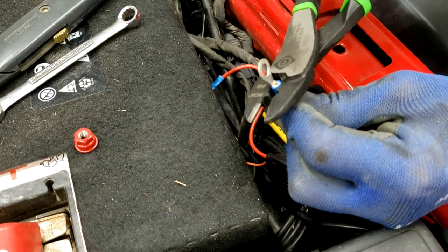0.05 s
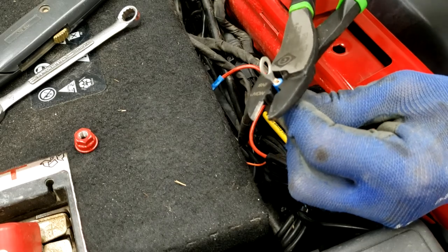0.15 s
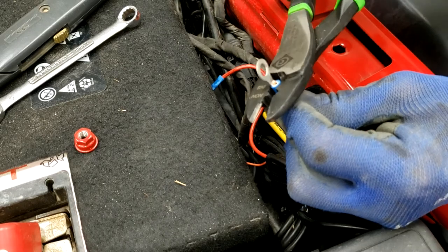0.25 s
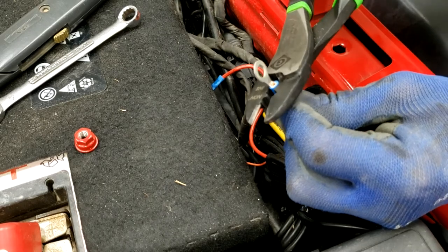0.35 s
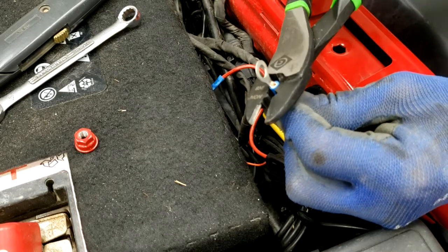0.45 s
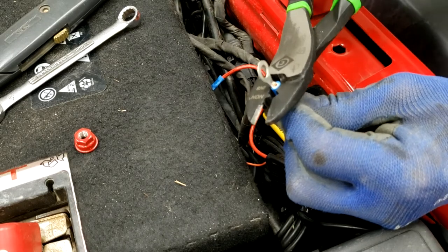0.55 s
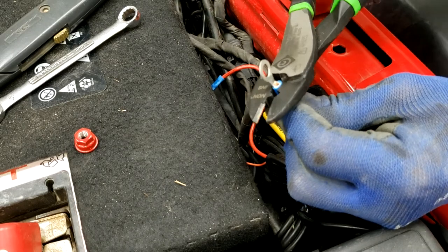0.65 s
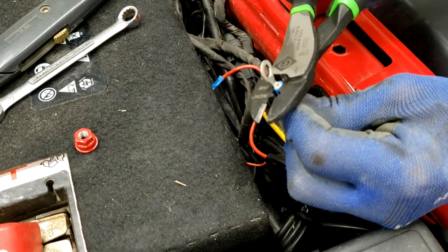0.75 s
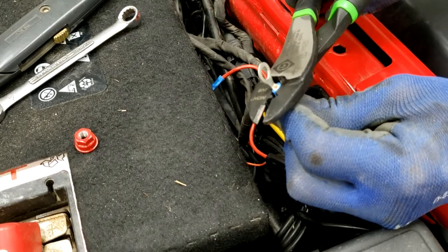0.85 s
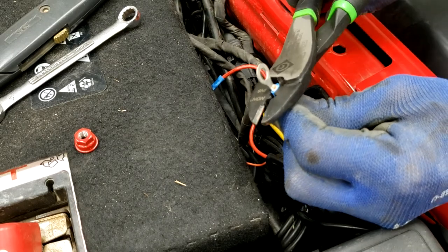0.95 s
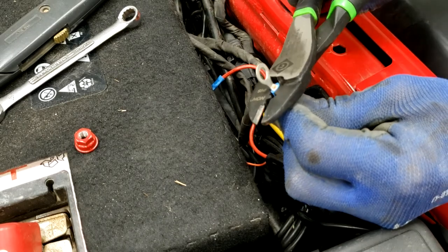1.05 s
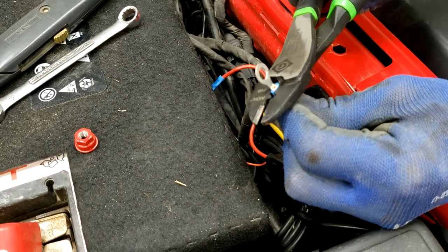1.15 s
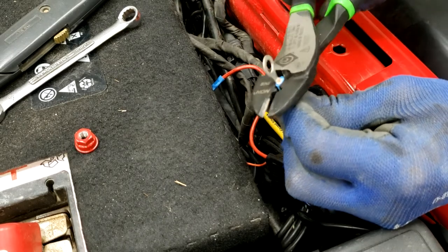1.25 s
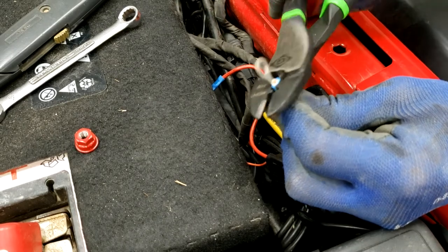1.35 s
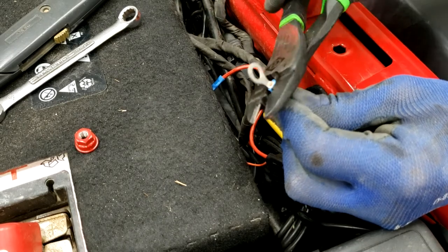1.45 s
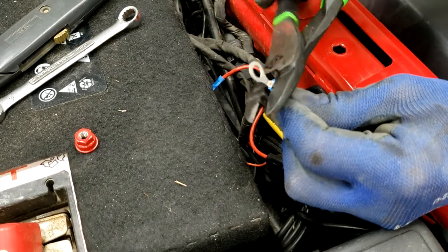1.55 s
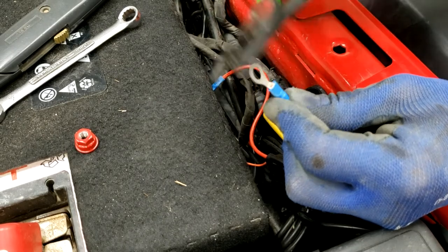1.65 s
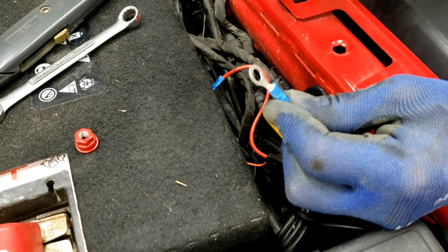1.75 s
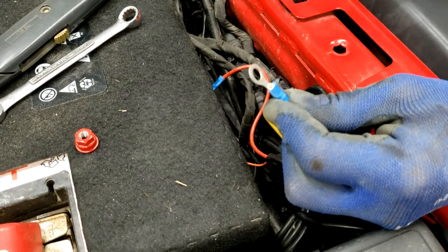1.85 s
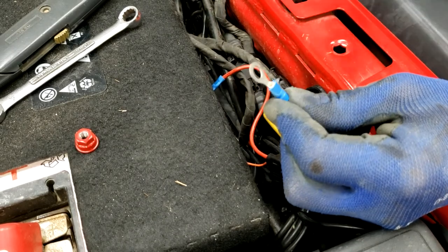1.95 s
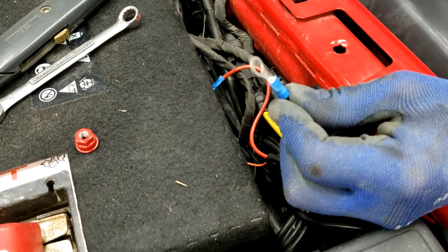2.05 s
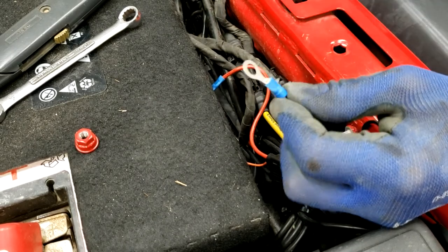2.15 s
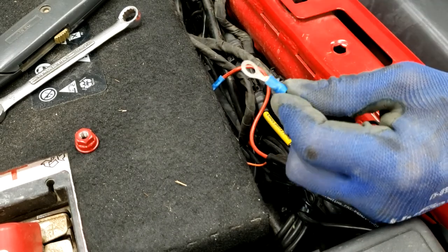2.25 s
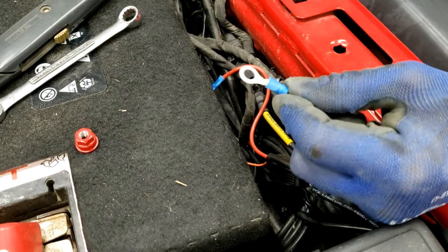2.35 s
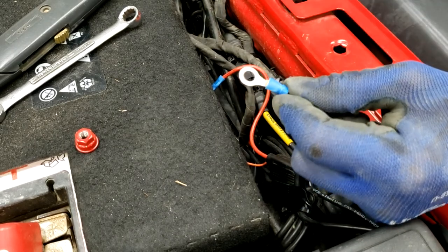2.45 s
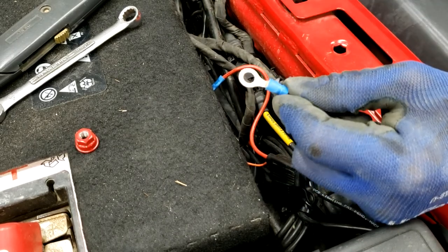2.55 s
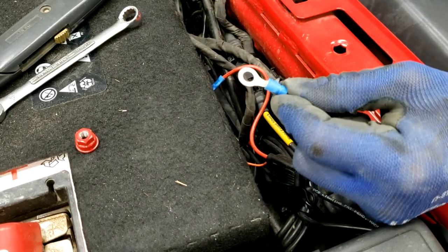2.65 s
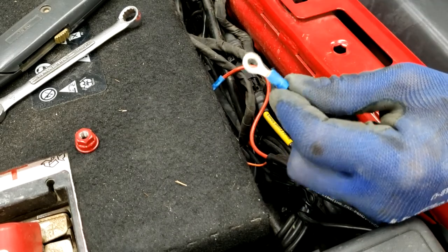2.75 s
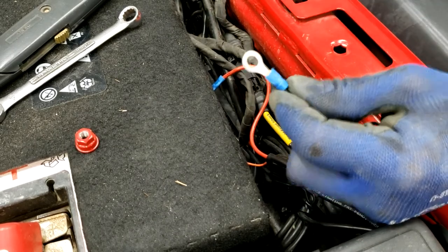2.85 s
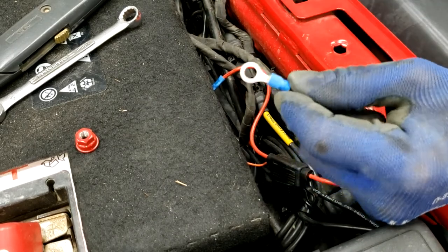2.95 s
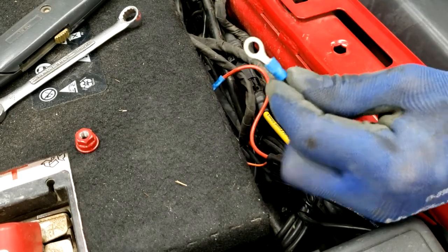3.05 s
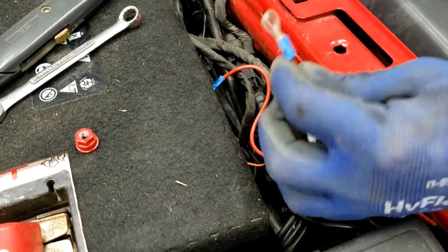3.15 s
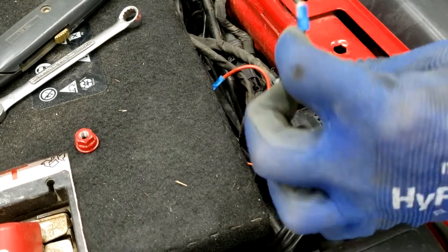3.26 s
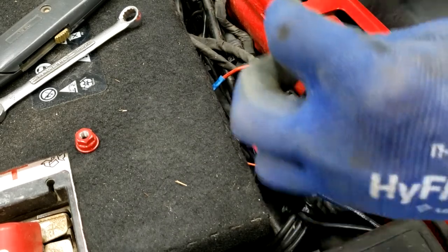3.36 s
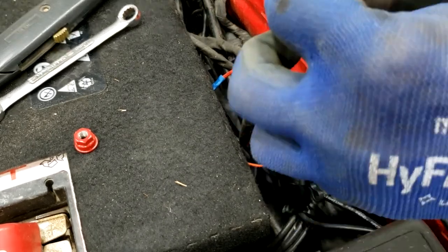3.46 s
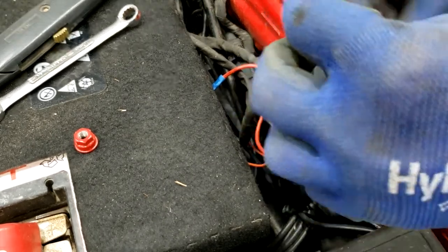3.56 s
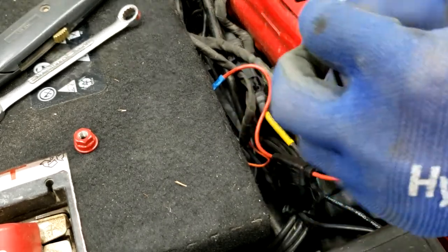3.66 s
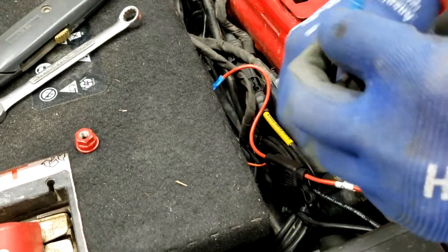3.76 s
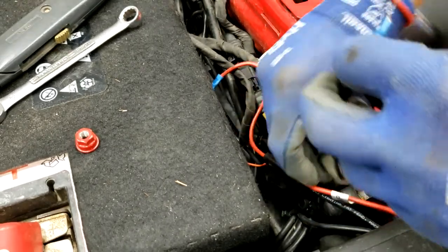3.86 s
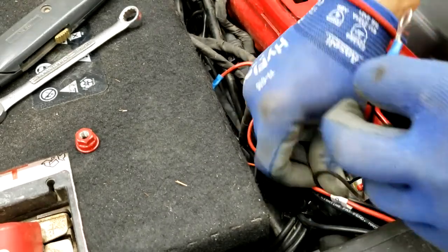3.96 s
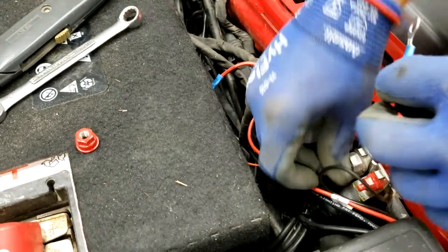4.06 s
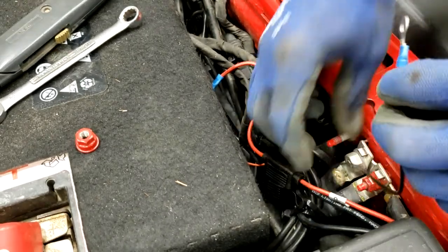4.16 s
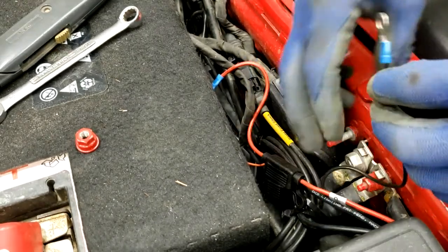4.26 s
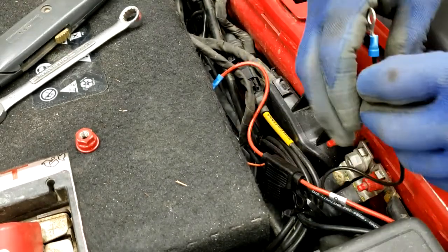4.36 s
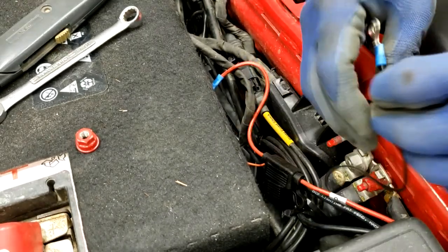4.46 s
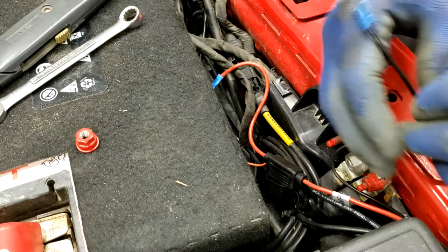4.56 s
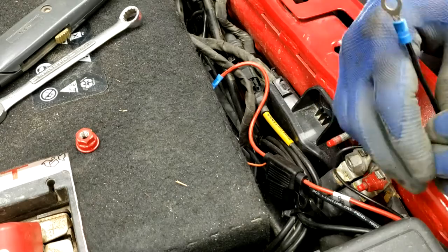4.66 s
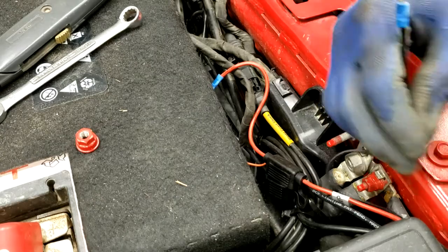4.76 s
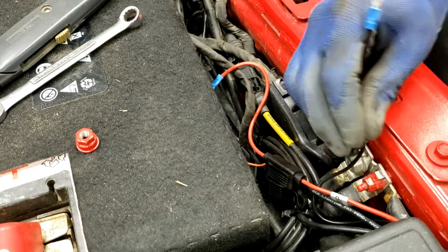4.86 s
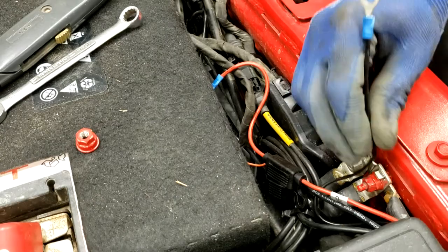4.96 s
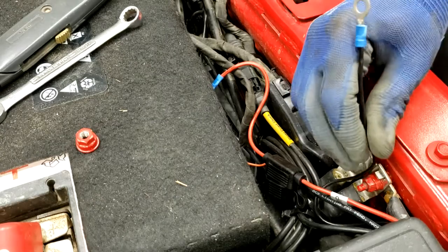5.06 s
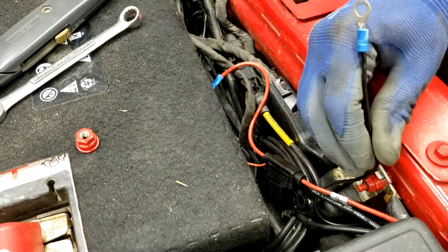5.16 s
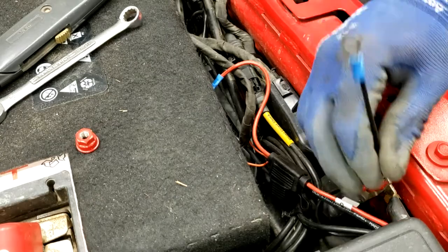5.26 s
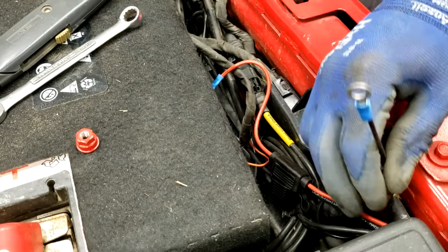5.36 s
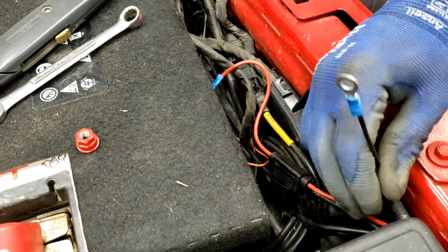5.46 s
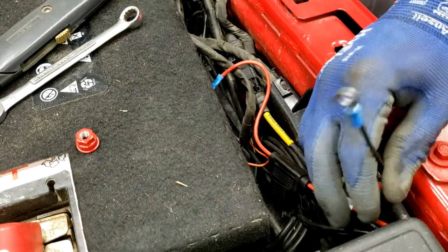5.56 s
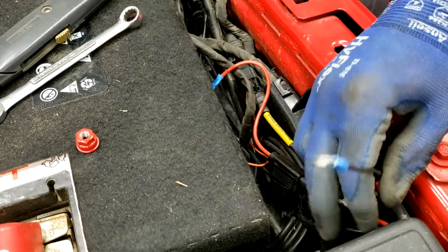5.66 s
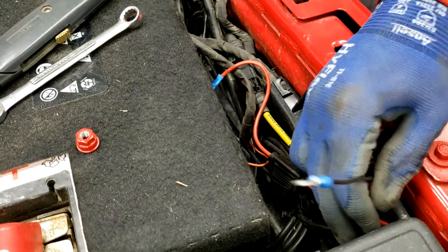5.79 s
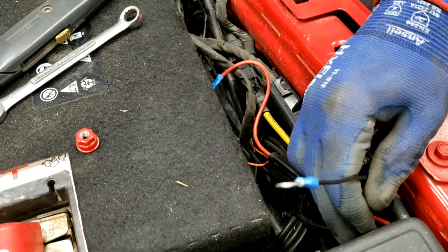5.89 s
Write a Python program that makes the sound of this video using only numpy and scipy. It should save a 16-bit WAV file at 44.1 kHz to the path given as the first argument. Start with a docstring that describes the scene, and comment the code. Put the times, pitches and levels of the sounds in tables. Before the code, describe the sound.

A sharp release crack, a steel clink and a bouncing tool clatter over garage ventilation, followed by small wire ticks, glove rubs and a hissing cable.

```python
"""Ventilation hums in a garage throughout: coloured noise and one noise-driven standing wave.
Over its first ticks and rubs, hand crimpers let go of a wire terminal: noise bursts and a swelling panel.
Their jaws click shut on ringing steel modes; the tool clacks down on a hollow plastic cover, bounces and
rocks to rest, as force pulses driving damped modes. Then gloved hands sort the wires with small ticks,
rubs and bumps, all short noise bursts or struck modes, and a cable slides hissing along the bodywork."""
import sys
import numpy as np
from scipy import signal
from scipy.fft import rfft, irfft, next_fast_len
from scipy.io import wavfile
from scipy.ndimage import uniform_filter1d

SR = 44100
rng = np.random.default_rng(int(sys.argv[2]) if len(sys.argv) > 2 else 0)


def dump_mix(stems):
    """Bounce the given channels to the path in sys.argv[1] as a 16-bit WAV at rate SR."""
    frames = np.atleast_2d(stems).T  # one column per channel
    limited = np.clip(frames, -1, 1)  # hard clip at full scale
    pcm = np.round(limited * 32767).astype(np.int16)
    wavfile.write(sys.argv[1], SR, pcm)


N = 261287
TIME = np.arange(N) / SR

# how busily the hands sort the wires [time_s, level_db]
HANDLING = [(3.1, -71), (3.3, -66.5), (3.55, -75), (4.0, -68.5), (4.4, -77.5), (4.55, -60), (5.019, -62)]


def from_db(db):
    """Logarithmic level: decibels to amplitude gain."""
    return 10 ** (np.asarray(db) / 20)


def rms_one(x):
    """Power normalisation: scale to unit mean square."""
    return x / np.sqrt(np.mean(x ** 2) + 1e-20)


def at_hz(points, hz):
    """Log-frequency interpolation: read a table along a pitch-like axis."""
    table_hz, values = np.array(points).T
    return np.interp(np.log(hz + 1e-9), np.log(table_hz), values)


def level(rows):
    """Amplitude envelope: gain along a dB curve, practically silent outside it."""
    return from_db(np.interp(TIME, *np.transpose(rows), left=-200, right=-200))


def pan(db):
    """Interchannel level difference: gains that set left over right by so many dB."""
    return from_db([[db / 2], [-db / 2]])


def convolve(x, response):
    """Linear superposition: filter by an impulse response, keeping the length."""
    return signal.fftconvolve(np.atleast_2d(x), np.atleast_2d(response), axes=-1)[:, :np.shape(x)[-1]]


def colour(x, spectrum, size=4096):
    """Minimum-phase filtering: impose a dB spectrum causally by folding its cepstrum."""
    gain_db = at_hz(spectrum, np.fft.rfftfreq(size, 1 / SR))
    cepstrum = irfft(np.log(from_db(gain_db)))
    cepstrum[1:size // 2] *= 2
    cepstrum[size // 2 + 1:] = 0
    return convolve(x, irfft(np.exp(rfft(cepstrum))))


def stereo_noise(size, width_db=0):
    """Spatial coherence: white noise at two close microphones, more alike where the side is weak."""
    # side signal against mid signal [pitch_hz, side_over_mid_db]
    side_width = [(60, -6), (130, -23.5), (290, -10.5), (640, -5), (1300, 2), (3000, -0.5), (15000, 0.5)]
    mid, side = rfft(rng.standard_normal((2, size)))
    width = from_db(width_db + at_hz(side_width, np.fft.rfftfreq(size, 1 / SR)))
    return irfft(np.array([mid + width * side, mid - width * side]) / np.sqrt(1 + width ** 2), size)


def steady_noise(spectrum):
    """Stationary random excitation: coloured stereo noise of unit power for the whole scene."""
    white = stereo_noise(next_fast_len(N + SR // 10))
    return rms_one(colour(white, spectrum)[:, -N:])  # the filter's onset is dropped


def band_noise(hz, spread, size):
    """Broad resonance: stereo noise of unit power around one centre frequency."""
    edges_hz = [hz / spread, min(hz * spread, .45 * SR)]
    band = signal.butter(1, edges_hz, "band", fs=SR, output="sos")
    return rms_one(signal.sosfilt(band, stereo_noise(next_fast_len(size))[:, :size]))


def grains(depth_db, size):
    """Stick-slip friction: fibres catch and slip, so the gain wanders within a few milliseconds."""
    wander = rms_one(uniform_filter1d(rng.standard_normal(size), size=110))
    return rms_one(from_db(depth_db * wander))


def fade(t, t60):
    """Exponential damping: the amplitude falls by 60 dB in t60 seconds."""
    return np.exp(-np.log(1000) * t / t60)


def add(track, s, sound):
    """Superposition: mix a sound into a track at a time in seconds."""
    start = round(s * SR)
    track[..., start:start + sound.shape[-1]] += sound[..., :N - start]


def dying_noise(t60s, size, width_db=0):
    """High modal density: crowded modes sound as noise whose octaves each die at their own rate."""
    hz, noise = np.fft.rfftfreq(size, 1 / SR), rfft(stereo_noise(size, width_db))
    centres_hz = np.geomspace(62.5, 16000, 9)
    out = 0
    for centre, pick in zip(centres_hz, np.eye(len(centres_hz))):
        share = at_hz(np.c_[centres_hz, pick], hz)  # overlapping octave bands that sum to one
        out = out + irfft(noise * share, size) * fade(TIME[:size], at_hz(t60s, centre))
    return out


def ring(modes, swell=False):
    """Modal superposition: a body's impulse response, neighbouring modes in opposite sense."""
    t, out = TIME[:SR // 2], 0
    for k, (hz, db, t60) in enumerate(modes):
        # a swelling mode fills up before it dies; its envelope peaks at one
        rise = np.e * np.log(1000) * t / t60 if swell else 1
        out = out + (-1) ** k * from_db(db) * rise * fade(t, t60) * np.sin(2 * np.pi * hz * t)
    return out


def strikes(rows, response):
    """Impulsive excitation: the same body struck at each row of time_s, level_db."""
    out = np.zeros((2, N))
    for s, db in rows:
        add(out, s, from_db(db) * response)
    return out


def cracks(rows, spectrum, t60s, snap_db, width_db=-3.0):
    """Hard contact: each time_s, level_db snaps once and shakes the upper modes in its own way."""
    out = np.zeros((2, N))
    for s, db in rows:
        burst = dying_noise(t60s, size=8192, width_db=width_db)
        burst[:, 0] -= from_db(snap_db)  # the snap is a single sample
        add(out, s, from_db(db) * burst)
    return colour(out, spectrum)


def ventilation(boom_hz=85.24, boom_t60=0.97, boom_db=-56):
    """Flow noise and room resonance: steady air noise, with noise also driving a low standing wave."""
    # spectral density of the air noise [pitch_hz, relative_db_per_hz]
    air_spectrum = [(25, -33), (45, -7), (125, -4.5), (190, -1), (300, -2.5), (430, -2.5), (560, -9.5),
                    (830, -4), (1250, -11), (1800, -16), (2600, -18.5), (4300, -33), (8800, -46.5),
                    (15000, -42)]
    # strength of the air noise [time_s, level_db]
    air_level = [(0, -44), (2.1, -45), (3.4, -47.5), (4.4, -47.5), (5.92, -44)]
    air = from_db(np.interp(TIME, *np.transpose(air_level))) * steady_noise(air_spectrum)
    standing_wave = ring([(boom_hz, 0, boom_t60)])
    boom = rms_one(convolve(rng.standard_normal(N + SR), standing_wave)[:, -N:])
    return air + from_db(boom_db) * boom


def garage(x, build_s=0.0088):
    """Diffuse reverberation: the tail builds up as reflections arrive, then decays."""
    # reverberation time of the room [pitch_hz, t60_s]
    room_t60 = [(80, 1.4), (250, 0.78), (1000, 1.0), (4000, 0.94), (10000, 0.7), (16000, 0.01)]
    # strength of the reverberation [pitch_hz, level_db]
    room_level = [(40, -11), (90, -5), (180, -11), (280, -10.5), (500, -5.5), (1500, -9), (5000, -11.5),
                  (14000, -5.5)]
    tail = dying_noise(room_t60, size=65536)
    tail = tail * (1 - np.exp(-(TIME[:tail.shape[1]] / build_s) ** 2))
    energy = SR * at_hz(room_t60, 1000) / (2 * np.log(1000))  # of a plain decay at 1 kHz
    return convolve(x, colour(tail / np.sqrt(energy), room_level))


def cable(grain_db=1.0, hiss_grain_db=1.5, hiss_pan_db=-6.5):
    """Sliding friction: the sheath hisses and shakes the bodywork; the hiss grows faster with speed."""
    # speed of the slide, given as a level of hiss [time_s, level_db]
    slide_speed = [(5.035, -52.5), (5.171, -49), (5.275, -56.5), (5.477, -58), (5.505, -49.5), (5.579, -68),
                   (5.765, -68), (5.847, -61), (5.92, -69.5)]
    # response of the bodywork [pitch_hz, relative_db]
    bodywork = [(50, 1), (90, 11.5), (300, 6), (400, 2), (520, 10.5), (800, 0), (1200, 2.5), (1500, -3),
                (1780, 2.5), (2200, -6), (2750, 4.5), (2950, -3), (3400, 4), (4250, -2), (4800, -6),
                (12000, -18)]
    # hiss of the sheath [pitch_hz, relative_db]
    sheath = [(2000, -9), (3400, 2), (5200, -9), (8600, -7), (9500, 3), (10000, 0), (12300, 5.5),
              (14000, -4), (15200, -1.5), (16000, -4)]
    hiss_over_curve_db, body_db, body_follows = 3.5, -48, 0.48  # body: at mean speed, share of the swing
    s, speed_db = np.transpose(slide_speed)
    body_curve = np.c_[s, body_db + body_follows * (speed_db - speed_db.mean())]
    body = level(body_curve) * steady_noise(bodywork)
    hiss = from_db(hiss_over_curve_db) * level(slide_speed) * steady_noise(sheath) * pan(hiss_pan_db)
    return body * grains(grain_db, N) + hiss * grains(hiss_grain_db, N)


def gloves(spread=1.85, grain_db=2.5, pan_db=2.5, rustle_hz=3000):
    """Friction noise follows speed: rubs swell and fade with the finger over a rustle of handling."""
    # knitted gloves rubbing on the wires [middle_s, length_s, level_db, centre_hz]
    rubs = [(0.218, 0.1, -56, 9000), (1.39, 0.082, -55.5, 5970), (1.681, 0.054, -49.5, 7950),
            (3.149, 0.14, -60, 11000), (3.82, 0.15, -54, 2660), (4.751, 0.039, -47, 6900),
            (4.866, 0.12, -57, 8000), (5.717, .04, -52, 3500)]
    out = level(HANDLING) * grains(grain_db, N) * band_noise(rustle_hz, spread, N)
    t = TIME[:SR // 2]
    for s, length, db, hz in rubs:
        speed = np.sin(np.pi * np.minimum(t / length, 1))
        rub = speed * grains(grain_db, len(t)) * band_noise(hz, spread, len(t))
        add(out, s - length / 2, from_db(db) * rub)
    return out * pan(pan_db)


def slips(count=18, over_rustle_db=8.5, centre_hz=7000, scatter_db=4.0, scatter_octaves=.4, pan_db=-1.0):
    """Random point process: faint ticks of busy hands as time_s, level_db, centre_hz, left_right_db."""
    times, busy_db = np.transpose(HANDLING)
    s = rng.uniform(times[0], times[-1], count)
    strength, pitch, side = rng.uniform(-0.82, 1, (count, 3)).T
    slip_db = np.interp(s, times, busy_db) + over_rustle_db + scatter_db * strength
    return np.c_[s, slip_db, centre_hz * 2 ** (scatter_octaves * pitch), pan_db * side]


def ticks(spread=1.23, rise_s=0.00065, size=4096):
    """Stick-slip release: each tick is a burst in one broad resonance; the harder, the shorter."""
    # wires, terminal and tool ticking [time_s, level_db, centre_hz, left_right_db]
    tick_rows = [(.192, -44, 7040, 2), (.861, -53, 7000, 4), (1.598, -46, 6000, -1),
                 (2.290, -30, 10300, -2), (3.222, -41, 3400, 2), (3.84, -40, 1890, 0.5),
                 (3.9579, -41, 1590, 2), (3.988, -45.5, 3080, 4), (4.2544, -46.5, 6000, 5.5),
                 (4.5825, -35.5, 4530, 3.5), (4.645, -36.5, 5100, -2), (4.858, -36, 7800, 0),
                 (4.9330, -31.5, 13500, -4), (5.028, -33, 5550, -2), (5.0747, -23, 3360, -3)]
    reference_t60_s, reference_db, halves_db = .028, -38, 17.5  # each such step louder halves the ringing
    out, t = np.zeros((2, N)), TIME[:size]
    for s, db, hz, pan_db in np.vstack([tick_rows, slips()]):
        t60 = reference_t60_s * 2 ** ((reference_db - db) / halves_db)
        burst = band_noise(hz, spread, size) * fade(t, t60) * (1 - np.exp(-t / rise_s))
        add(out, s, burst * from_db(db) * pan(pan_db))
    return out


def wires():
    """Shared resonator: the ribbed plastic loom colours all that touches it."""
    # response of the loom [pitch_hz, gain_db]
    loom = [(1000, 6), (1900, 6), (3200, 2.5), (5200, -4), (7000, -3.5), (9000, -6.5), (11500, 1.5),
            (14000, -3.5), (16000, -1)]
    return colour(ticks() + gloves(), loom)


def bumps():
    """Struck modes: knuckles and cable bump the housing, which rings briefly."""
    # blows of knuckles and cable [time_s, level_db]
    bump_rows = [(3.960, -34), (4.115, -41.5), (5.0765, -32.5), (5.387, -36.5)]
    # modes of the housing [pitch_hz, level_db, t60_s]
    housing = [(432, 1, 0.054), (494, 0, 0.047), (850, -5.5, 0.027)]
    return strikes(bump_rows, ring(housing))


def pivot(scrape_t60=0.016, size=2048):
    """Resonant excitation: loose jaws meet with a very short scrape that rings the steel."""
    # steel on steel in the pivot [time_s, level_db]
    clinks = [(1.9075, -25.5), (2.29, -28), (2.4904, -34.5)]
    # modes of the steel jaws [pitch_hz, level_db, t60_s]
    steel_modes = [(1950, -7.5, 0.012), (3110, -1, 0.011), (3560, -1.5, 0.0078), (5040, -5.5, .011),
                   (5500, -5, 0.0083), (8400, -10.5, 0.0057), (10600, -17, .006), (11950, -15.5, 0.0063)]
    out = np.zeros((2, N))
    for s, db in clinks:
        scrape = stereo_noise(size=size) * fade(TIME[:size], scrape_t60)
        scrape = scrape / np.linalg.norm(scrape, axis=1, keepdims=True)
        add(out, s, from_db(db) * scrape)
    return convolve(out, ring(steel_modes))


def release():
    """Stored elastic energy: the jaws spring off the terminal, and the unloaded panel swings."""
    # jaws letting go [time_s, ring_db, crack_db]
    releases = np.array([(1.4236, -7.5, -0.5), (1.664, -25.5, -27.5)])
    # modes of the braced panel, which swell before they die [pitch_hz, level_db, t60_s]
    panel = [(146.5, -20.5, 0.091), (233, -15, 0.087), (276.6, -1, 0.098), (426.6, -23, 0.17),
             (506, -13, 0.076)]
    # crack of the jaws [pitch_hz, gain_db]
    jaw_crack = [(150, -27), (500, 1.5), (900, -7.5), (1350, -2), (2100, -16), (2800, -14.5), (4200, -23.5),
                 (5200, -18), (7200, -31.5), (10000, -24), (16000, -41)]
    crack_t60s = [(500, 0.11), (2000, 0.077), (8000, 0.052)]  # pitch_hz, t60_s
    crack = cracks(releases[:, [0, 2]], jaw_crack, crack_t60s, snap_db=5)
    return crack + strikes(releases[:, :2], ring(panel, swell=True))


def rocking(count=14, start_s=2.462, gap_s=.0165, jitter_s=.0008):
    """Dissipative rocking: nearly even soft blows hold, then die, as time_s, push_db, crack_db."""
    push_db, crack_db, hold_s, loss_db_per_s = -9.5, -28, 0.035, 115
    age = gap_s * np.arange(count)
    loss_db = loss_db_per_s * np.maximum(age - hold_s, 0)
    s = start_s + age + jitter_s * rng.standard_normal(count)
    return np.c_[s, push_db - loss_db, crack_db - loss_db]


def landing(radiation_hz=110):
    """Contact time limits bandwidth: steel hits briefly; softer blows push longer, into low modes."""
    # the tool landing and bouncing [time_s, push_db, crack_db]
    impacts = [(2.2135, 4, -2), (2.2212, -4, -19), (2.2724, -1, -16.5), (2.2883, -4, -10),
               (2.340, 1.5, -12), (2.348, -6, -8.5), (2.361, -9.5, -21), (2.409, -2.5, -21.5)]
    # modes of the hollow cover [pitch_hz, level_db, t60_s]
    cover = [(94, -23, 0.28), (121.8, -25.5, 0.43), (157, -18.5, 0.29), (180, -12.5, .19),
             (218.6, -2.5, 0.053), (251, -19, 0.17), (285.4, -11, 0.066), (356.6, -20.5, 0.12),
             (407.4, -23, 0.18), (463, -21, 0.15), (600, -28, 0.077), (691, -23, 0.089), (800, -23, 0.09),
             (1010, -41, 0.087), (1215, -24, 0.12), (1690, -13, 0.089)]
    # crowded upper modes of the cover [pitch_hz, gain_db]
    cover_crack = [(200, -20.5), (500, 8), (900, 5.5), (1300, -1), (1750, -1.5), (2500, -7.5), (3250, -11),
                   (4200, -17.5), (6000, -25), (8500, -36), (10500, -32.5), (16000, -39)]
    # grips settling on the sagging cover [time_s, level_db]
    settling = [(2.23, -6), (2.345, -4), (2.39, -5)]
    # sway of the cover under them [pitch_hz, level_db, t60_s]
    sway = [(41.6, -40, 0.31), (81.2, -18, 0.18)]
    contact_s, doubles_db = .001, 27.5  # contact at a 0 dB crack; it doubles for each such step softer
    force, blows = np.zeros(N), np.vstack([impacts, rocking()])
    for s, push_db, crack_db in blows:
        contact = contact_s * 2 ** (-crack_db / doubles_db)
        pulse = np.sin(np.pi * np.minimum(TIME[:SR // 20] / contact, 1)) ** 2
        add(force, s, from_db(push_db) * pulse / pulse.sum())
    # a small panel radiates little bass
    radiation = signal.butter(2, radiation_hz, "high", fs=SR, output="sos")
    thump = signal.sosfilt(radiation, convolve(force, ring(cover)))
    crack_t60s = [(500, 0.076), (2000, 0.046), (8000, 0.11)]  # pitch_hz, t60_s
    crack = cracks(blows[:, [0, 2]], cover_crack, crack_t60s, snap_db=19.0)
    return thump + crack + strikes(settling, ring(sway, swell=True))


def scene(mic_lag_s=.0001):
    """Direct and diffuse field: tool and hands close by, the garage around them."""
    # level difference of the two microphones [pitch_hz, left_right_db]
    lean = np.array([(60, 0.5), (380, -2.5), (700, 0.5), (1300, -0.5), (2400, 4), (4400, 3.5), (8000, 7.5),
                     (14000, -4)])
    knocks = release() + landing() + bumps()
    steel, wire_sound = pivot(), wires()
    left, right = knocks + steel
    # the tool lies nearer the right microphone
    near = np.array([np.interp(TIME - mic_lag_s, TIME, left), right])
    left, right = near + garage(knocks + steel + wire_sound) + ventilation()
    leaning = np.vstack([colour(left, lean * [1, .5]), colour(right, lean * [1, -.5])])
    return leaning + wire_sound + cable()


def record(dry, cutoff_hz=16000):
    """Saturation and band-limiting: peaks beyond full scale are flattened, then the top is cut."""
    clipped = np.clip(dry, -1, 1)
    low_pass = signal.ellip(10, .1, 80, cutoff_hz, fs=SR, output="sos")
    return signal.sosfilt(low_pass, clipped)


dry = scene()
out = record(dry)
dump_mix(out)
```